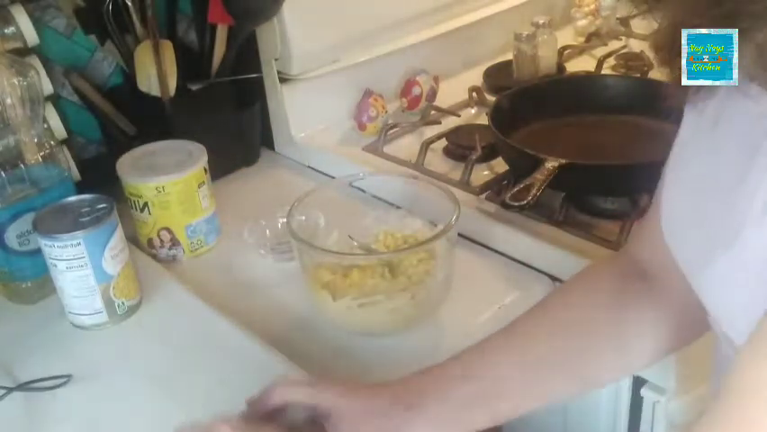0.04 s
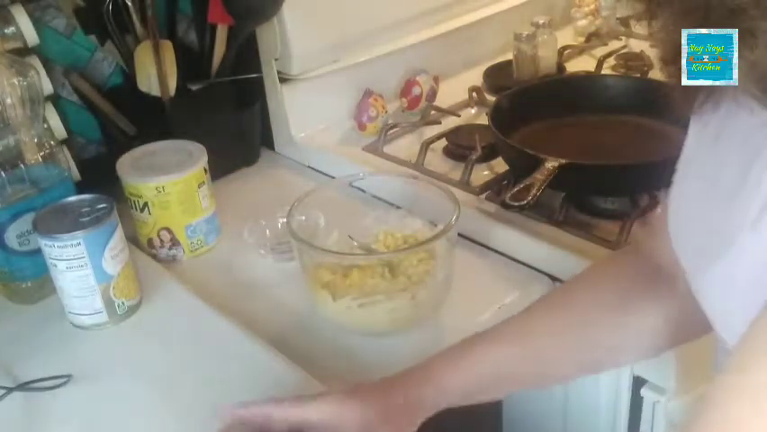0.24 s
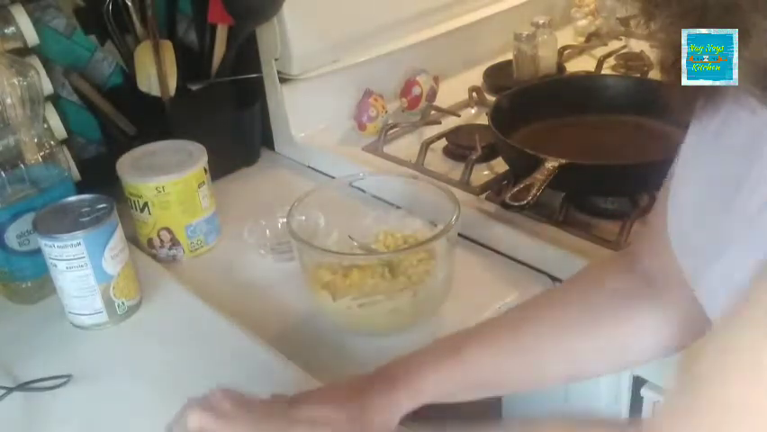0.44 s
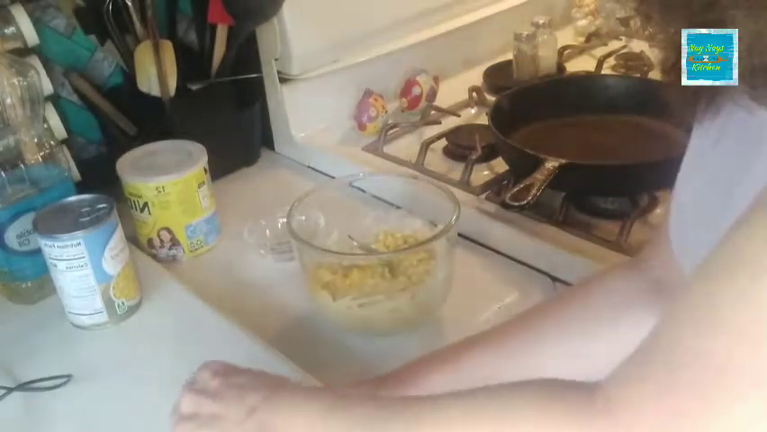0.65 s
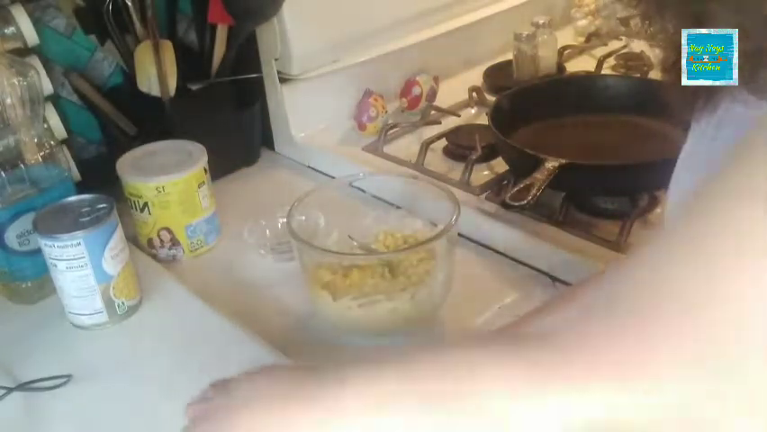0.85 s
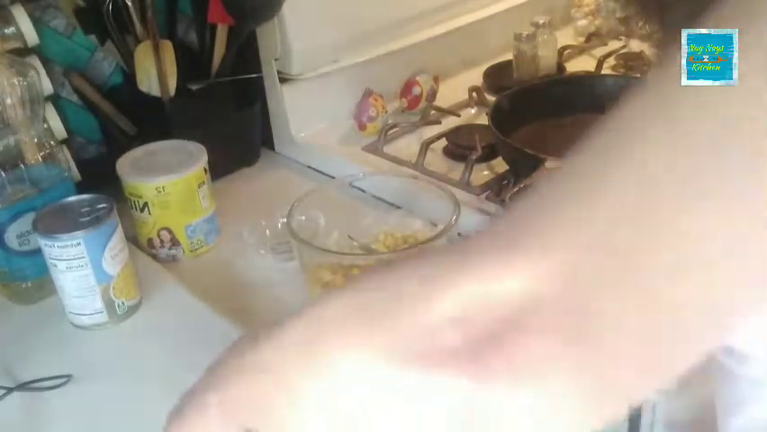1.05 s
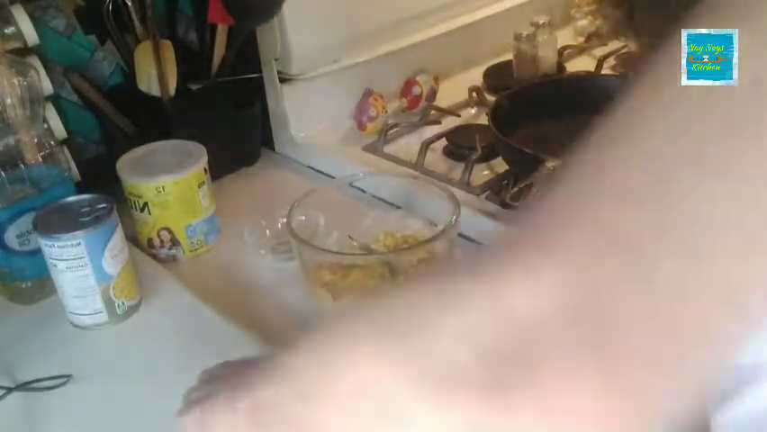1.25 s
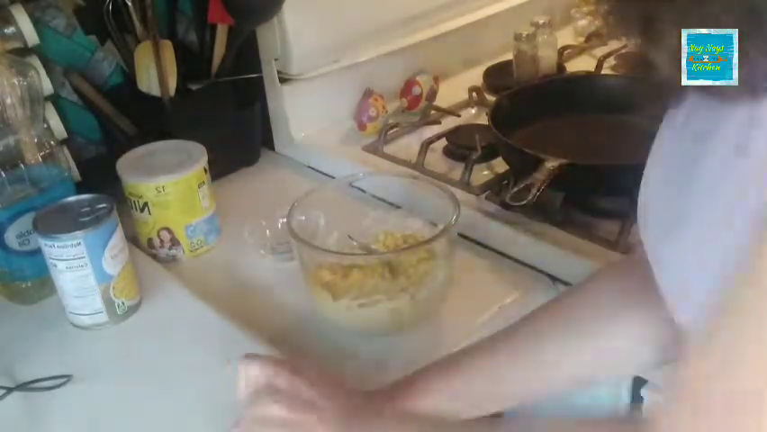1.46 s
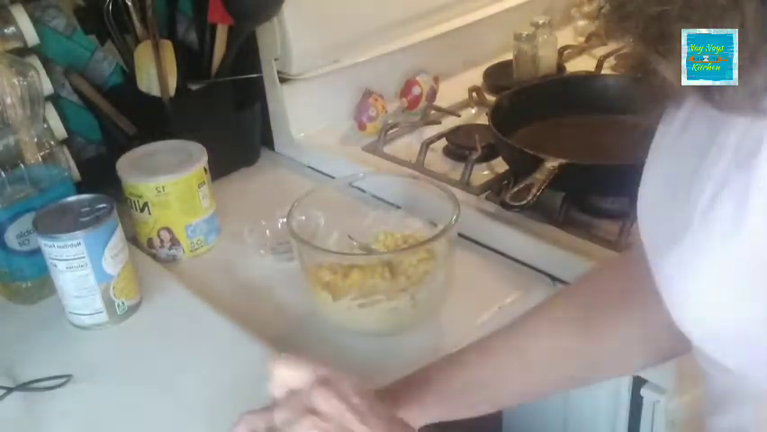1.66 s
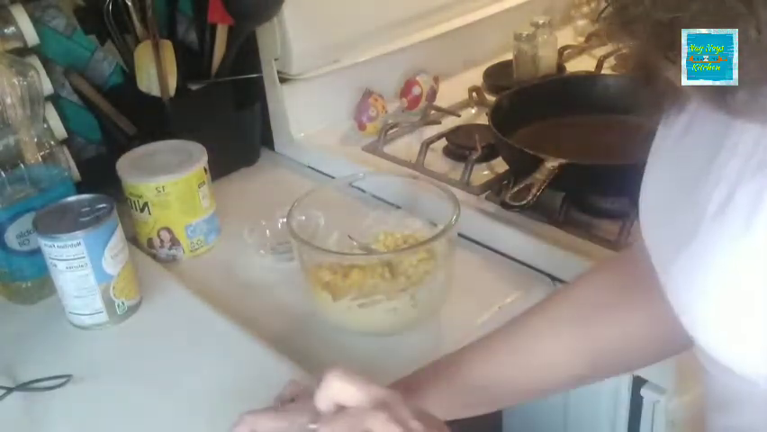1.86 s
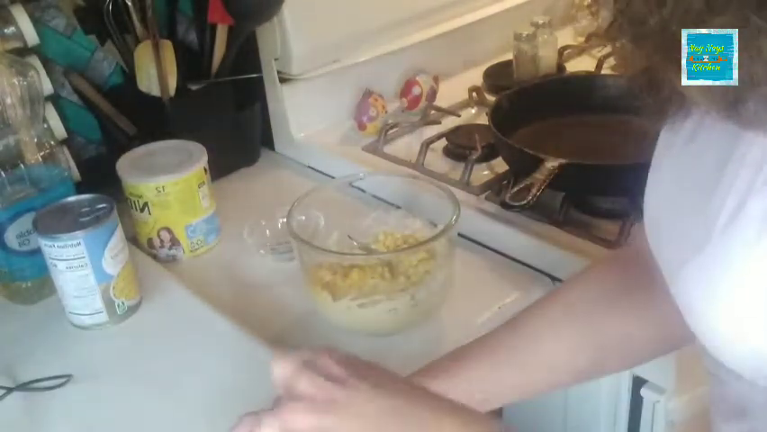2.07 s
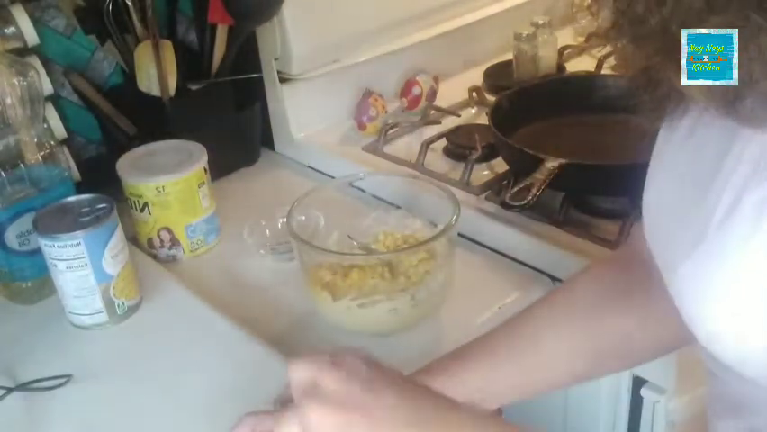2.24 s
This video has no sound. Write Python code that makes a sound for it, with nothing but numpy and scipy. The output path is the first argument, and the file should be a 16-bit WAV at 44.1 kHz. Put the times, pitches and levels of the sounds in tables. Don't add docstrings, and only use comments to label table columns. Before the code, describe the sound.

A small metal can is handled on a kitchen counter, close to the microphone. Faint finger touches come first, then a loud ringing knock at 0.24 seconds, a quick second at 0.35 and a duller third at 0.8. At 1.16 the rim clinks and scrapes, with a brief rising squeak; two fainter raspy drags follow until 1.8. Short room echo, soft air noise and low fridge hum throughout.

```python
import sys
import numpy as np
from scipy import signal
from scipy.fft import rfft, irfft, next_fast_len
from scipy.io import wavfile
from scipy.ndimage import uniform_filter1d

SR = 44100
rng = np.random.default_rng(int(sys.argv[2]) if len(sys.argv) > 2 else 0)


def persist_wave(psi):
    counts = np.round(np.clip(psi, -1, 1) * 32767).astype(np.int16)
    wavfile.write(sys.argv[1], SR, np.atleast_2d(counts).T)


def level_to_linear(level):
    exponent = np.asarray(level, float) / 20
    return 10 ** exponent


N = 101429
TIME = np.arange(N) / SR
TOUCH_TIME = np.arange(9000) / SR


def evened(x):
    return x / np.sqrt(np.mean(x ** 2) + 1e-20)


def slow(span):
    return evened(uniform_filter1d(uniform_filter1d(rng.standard_normal(N), span), span))


def read(points, hz):
    f, value = np.transpose(points)
    return np.interp(np.log(hz + 1), np.log(f + 1), value)


def along(curve):
    s, db = np.transpose(curve)
    return level_to_linear(np.interp(TIME, s, db, -120, -120))


def shaped(x, gain):
    size = next_fast_len(N + 4096)
    spectrum = rfft(x, size) * gain(np.fft.rfftfreq(size, 1 / SR))
    return irfft(spectrum, size)[..., :N]


def add(mix, s, sound):
    part = mix[round(s * SR):][:len(sound)]
    part += sound[:len(part)]


def resonate(x, hz, width):
    turn = np.exp(2j * np.pi * np.cumsum(hz * np.ones(len(x))) / SR)
    r = np.exp(-np.pi * abs(width) / SR)
    for _ in range(2):
        x = 2 * (turn * signal.lfilter([1 - r], [1, -r], x / turn)).real
    return x


def modes(hz, db, t60, phase):
    t = TOUCH_TIME[:, None]
    rise_s = 0.00085 + 0.67 / hz
    rise = 1 - np.exp(-t / rise_s)
    return (rise * level_to_linear(db - 60 * t / t60) * np.sin(2 * np.pi * (hz * t + phase))).sum(1)


# [f/Hz, level/dB]
BODY = [(170, -3.5), (260, -18), (430, -2.5), (620, -11.5), (1200, -1), (2100, -1), (9000, -23.5),
        (16000, -34.5)]
# [f/Hz, t60/s]
BODY_T60 = [(100, 0.12), (500, 0.099), (2000, 0.066), (6000, 0.043), (14000, 0.05)]


def knock(db, tilt_db, ring):
    u = rng.random((320, 3))
    hz = np.geomspace(70, 15500, len(u)) * (1 + 0.033 * u[:, 0])
    level = read(BODY, hz) + 10 * np.log10(hz / 1000)
    level += tilt_db * np.log2(hz / 1000) + 6.0 * u[:, 1]
    crowd = modes(hz, level, read(BODY_T60, hz), u[:, 2])
    f, d, t60 = np.transpose(ring)
    clear = modes(f, d, np.clip(t60 * 0.45, 0.02, 0.08), 0.33 * rng.random(len(f)))
    thump = modes(np.array([167.6]), -7, 0.044, 0)
    tick = uniform_filter1d(rng.standard_normal(9000), size=3) * level_to_linear(-60 * TOUCH_TIME / 0.022)
    sound = evened(crowd) + evened(clear)
    return level_to_linear(db) * (sound / abs(sound).max() + level_to_linear(-14.5) * tick + thump)


# [t/s, peak level/dB, brightness/dB per octave]
KNOCKS = [
    (0.24, -2, -0.5),
    (0.347, -6.5, -1),
    (0.806, -8, -1.5),
]
# [f/Hz, level/dB, t60/s]
FIRST_RING = [(499, 5.5, 0.144), (621, 1, 0.17), (736, 1, 0.2), (827, -2, 0.18), (1130, -13, 0.15),
              (1167, 11.5, 0.051), (1195, 5.5, 0.068), (1740, -21, .12), (2330, -25, 0.12),
              (3590, -4, 0.066)]
SECOND_RING = [(480.4, 1.5, 0.135), (798, -4, 0.19), (1130, -14, 0.22), (1351, -26, 0.1), (1760, 6, 0.061),
               (2220, -32, 5.0), (3180, -14, 0.046), (4070, -36, 0.32), (5292, -38, 0.25)]
THIRD_RING = [(429, -7.5, .2), (811, -7.5, .17), (981, -5.5, 0.13), (1208, -1, 0.094), (1373, -9, 0.069),
              (1773, 1, 0.089), (1835, -6, 0.15), (2280, -13, 0.15), (3380, -8, 0.062)]


def knocks():
    out = np.zeros(N)
    for (s, db, tilt_db), ring in zip(KNOCKS, (FIRST_RING, SECOND_RING, THIRD_RING)):
        add(out, s, knock(db, tilt_db, ring))
    return out


# [f/Hz, level/dB]
RASP = [(200, -6), (432, -6), (683, -9.5), (1810, -4), (4000, -10), (7680, -17.5), (12000, -22.5),
        (16000, -35)]


def gripped_wall(slips, grip):
    wall = np.zeros(N)
    for hz, width, db, s in grip:
        wavering_hz = hz * (1 + 0.016 * slow(1500))
        freedom_db = np.maximum(-4.3 * ((TIME - s) / 0.035) ** 2, -11)
        drive = slips * level_to_linear(3 * slow(900) + freedom_db)
        wall += level_to_linear(db) * resonate(drive, wavering_hz, 1.94 * width) / np.sqrt(abs(width))
    return wall


def scrape(curve, grip):
    slips_per_s, spread_db = 14000, 1.5
    slips = rng.standard_normal(N) * level_to_linear(spread_db * rng.exponential(1, N))
    slips *= rng.random(N) < slips_per_s / SR
    wall = gripped_wall(slips, grip)
    z = signal.stft(shaped(slips, lambda hz: level_to_linear(read(RASP, hz))), nperseg=256)[2]
    patches = uniform_filter1d(rng.standard_normal(z.shape), size=3, axis=0)
    patches = evened(uniform_filter1d(patches, size=9, axis=1))
    rasp = signal.istft(z * level_to_linear(1.8 * patches), nperseg=256)[1][:N]
    return along(curve) * (level_to_linear(-9) * evened(wall) + level_to_linear(-2.5) * evened(rasp))


# [t/s, level/dB]
FIRST_STROKE = [(1.162, -25.5), (1.176, -35.5), (1.185, -26.5), (1.205, -27.5), (1.219, -34.5),
                (1.25, -35.5), (1.262, -41.5), (1.31, -50)]
# [t/s, level/dB]
LATER_STROKES = [
    [(1.31, -58), (1.33, -38.5), (1.352, -37), (1.362, -28.5), (1.394, -27.5), (1.438, -38), (1.494, -34.5),
     (1.522, -54.5), (1.54, -55)],
    [(1.54, -49.5), (1.59, -37.5), (1.615, -40.5), (1.658, -36), (1.694, -42.5), (1.708, -33.5),
     (1.745, -36.5), (1.78, -41), (1.835, -59)],
]
# [f/Hz, width/Hz, level/dB, freest t/s]
FIRST_GRIP = [(757, 67, -11.5, 1.2), (1905, 76, -11, 1.22), (2596, 48, -1, 1.227), (2845, 36, -2, 1.218),
              (4010, 66, -13.5, 1.2), (5530, 120, -18.5, 1.185), (2714, 32, -3, 1.4)]
SECOND_GRIP = [(1110, 99, -4.5, 1.445), (1676, 62, -7.5, 1.39), (1915, 48, -6.5, 1.365),
               (2740, 45, 0.5, 1.4), (3110, 130, -4, 1.37), (4260, 180, -10.5, 1.38), (1606, 46, 2, 1.49),
               (1840, 64, -1.5, 1.455)]
THIRD_GRIP = [(500, 98, -2.5, 1.72), (1600, 150, -2.5, 1.59), (1924, 70, -5, 1.73), (1980, 63, 2.5, 1.65),
              (3275, 33, -2, 1.65), (3590, 34, -3, 1.74), (2414, 180, -4, 1.72)]


def strokes():
    grips = (FIRST_GRIP, SECOND_GRIP, THIRD_GRIP)
    return sum(scrape(curve, grip) for curve, grip in zip([FIRST_STROKE, *LATER_STROKES], grips))


# [t/s, peak level/dB]
CLINK = (1.162, -16)
# [f/Hz, level/dB, t60/s]
CLINK_RING = [(450, -8, .04), (1080, 0, .04), (1250, -8, .035), (4200, -6, .035), (6000, -16, .03),
              (7300, -14, .03)]


def clink():
    out = np.zeros(N)
    s, peak_db = CLINK
    f, d, t60 = np.transpose(CLINK_RING)
    add(out, s, level_to_linear(peak_db) * modes(f, d, t60, rng.random(len(f))))
    return out


# [t/s, f/Hz, level/dB]
BEND = [(1.185, 1074, -48), (1.197, 1089, -28), (1.21, 1098, -30), (1.218, 1190, -32.5),
        (1.232, 1366, -41.5), (1.29, 1353, -49.5), (1.31, 1400, -60)]


def bend():
    s, hz, db = np.transpose(BEND)
    gliding_hz = np.interp(TIME, s, hz)
    tone = resonate(rng.standard_normal(N), gliding_hz, 49)
    return along(np.transpose([s, db])) * evened(tone)


# [pitch ratio, level/dB, t60/s]
TAP_RING = [(.58, -4.5, 0.054), (1.0, -2, 0.061), (1.35, -5, 0.04), (1.98, -3, 0.034)]


def tap(db, hz):
    f, d, t60 = np.transpose(TAP_RING)
    puff = signal.lfilter([0.2], [1, -0.8], rng.standard_normal(9000))
    puff *= level_to_linear(-9.5 - 60 * TOUCH_TIME / 0.055)
    soft_start = np.minimum(TOUCH_TIME / 0.004, 1)
    return level_to_linear(db) * (0.69 * modes(f * hz, d, t60, rng.random(len(f))) + puff) * soft_start


# [t/s, peak level/dB, f/Hz]
TAPS = [
    (.104, -45, 1600),
    (.130, -30, 818),
    (.453, -30, 852),
    (.572, -30.5, 835),
    (1.137, -33.5, 937),
]


def taps():
    out = np.zeros(N)
    for s, db, hz in TAPS:
        add(out, s, tap(db, hz))
    return out


# [t/s, level/dB]
HANDS = [(0.0, -59), (0.45, -63.5), (0.608, -59.5), (1.15, -70)]
# [f/Hz, level/dB]
AIR_TOP = [(9000, 2), (12000, -7.5), (14000, -7)]


def hands():
    unevenness = evened(uniform_filter1d(rng.standard_normal(N), 600))
    grains = rng.standard_normal(N) * level_to_linear(4.4 * unevenness)
    return along(HANDS) * evened(shaped(grains, lambda hz: level_to_linear(read(RASP, hz) + read(AIR_TOP, hz))))


# [f/Hz, level/dB]
MIC = [(5000, 3.5), (7500, 7), (8800, -1), (10500, 6.5), (12500, -9.5)]


def can():
    out = knocks() + strokes() + clink() + bend() + taps() + hands()
    return shaped(out, lambda hz: level_to_linear(read(MIC, hz)))


# [f/Hz, t60/s]
ROOM_T60 = [(150, 0.37), (1000, .3), (4000, 0.21), (12000, 0.19)]


def kitchen(x):
    taps = np.zeros((2, SR // 2))
    at = np.arange(100, SR // 2 - 20, 20)
    at = at + rng.integers(0, 20, (2, len(at)))
    np.put_along_axis(taps, at, rng.choice([-1., 1.], at.shape), 1)
    hz, t, z = signal.stft(taps, SR, nperseg=256)
    tail = signal.istft(z * level_to_linear(-60 * t / read(ROOM_T60, hz)[:, None]), SR, nperseg=256)[1]
    wet = signal.fftconvolve(x[None], tail / np.linalg.norm(tail[0]), axes=1)[:, :N]

    def low(hz):
        return 1 / (1 + (hz / 500) ** 2)

    return shaped(wet.mean(0), low) + shaped(wet, lambda hz: 1 - low(hz))


def fridge():
    swell_db = 1.2 * np.sin(2 * np.pi * 0.7 * TIME)
    return level_to_linear(-39.5 + swell_db) * np.sin(2 * np.pi * 157.6 * TIME)


# [f/Hz, level/dB, width/Hz]
HUM = [(155.3, -49, 7.6), (426.7, -52, 56), (1178, -58, 6.3), (7200, -68.5, 830)]


def fridge_bands():
    out = np.zeros((2, N))
    for hz, db, width in HUM:
        for port in out:
            port += level_to_linear(db) * evened(resonate(rng.standard_normal(N), hz, width))
    return out


def ports(x, pan, lag_s):
    side = np.array([[0.5], [-0.5]])
    return shaped(x, lambda hz: level_to_linear(side * read(pan, hz)) * np.exp(-2j * np.pi * hz * side * lag_s))


# [f/Hz, level/dB]
AIR = [(12, 1), (20, -4.5), (127, -10), (158, -5), (187, -18), (410, -17), (459, -17.5), (1190, -23.5),
       (16000, -53.5)]
# [f/Hz, likeness/-1 to 1]
AIR_SAME = [(60, 0.89), (240, 0.67), (950, 0.18), (3770, 0.85), (15000, -0.2)]
# [f/Hz, level/dB]
AIR_PAN = [(60, -1.5), (240, 0.5), (950, 0), (3770, 6.5), (15000, 3)]


def air():
    noise = fridge_bands()
    for port in noise:
        hiss = shaped(rng.standard_normal(N), lambda hz: level_to_linear(read(AIR, hz) + read(AIR_TOP, hz)))
        port += level_to_linear(-41) * evened(hiss)

    def same(hz):
        return np.clip(read(AIR_SAME, hz), 0, 1)

    right = shaped(noise[0], same) + shaped(noise[1], lambda hz: np.sqrt(1 - same(hz) ** 2))
    return ports(np.array([noise[0], right]), AIR_PAN, 0.00006)


# [f/Hz, likeness/0 to 1]
CAN_SAME = [(250, 0.99), (700, 0.56), (2000, 0.4), (8000, 0.13)]
# [f/Hz, level/dB]
CAN_PAN = [(150, -2.5), (400, -2.5), (950, 2), (2400, 0), (5000, 3), (9000, -1), (15000, -24)]


def scene():
    front, other = can(), can()

    def apart(hz):
        return np.arccos(np.clip(read(CAN_SAME, hz), 0, 1)) / 2

    shared = shaped(front, lambda hz: np.cos(apart(hz)))
    differing = shaped(other, lambda hz: 1j * np.sin(apart(hz)))
    direct = shared + [[1], [-1]] * differing
    return ports(direct + level_to_linear(-8) * kitchen(front), CAN_PAN, 0.00013) + air() + fridge()


def top_cut(x):
    return signal.sosfilt(signal.butter(12, 16170, fs=SR, output="sos"), x)


def record(dry):
    ceiling, edge_hz = 1.7, 16300
    held = np.clip(ceiling * np.tanh(dry / ceiling), -1, 1)
    mix = shaped(held, lambda hz: 1 / (1 + (hz / edge_hz) ** 60))
    return top_cut(mix)


dry = scene()
out = record(dry)
persist_wave(out)
```